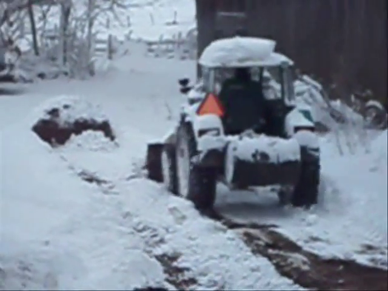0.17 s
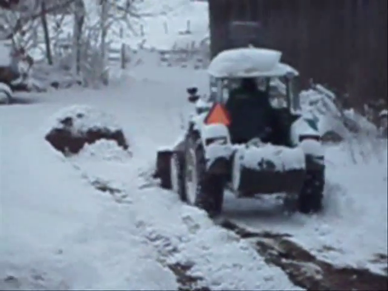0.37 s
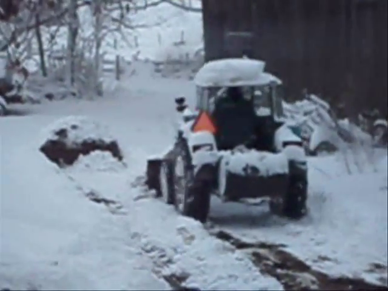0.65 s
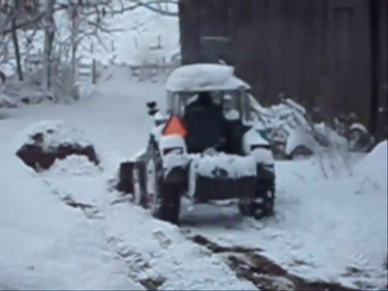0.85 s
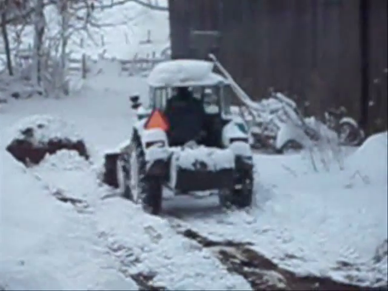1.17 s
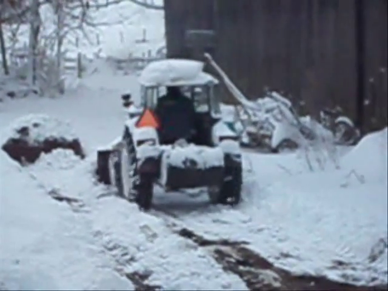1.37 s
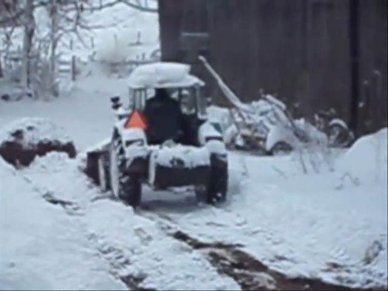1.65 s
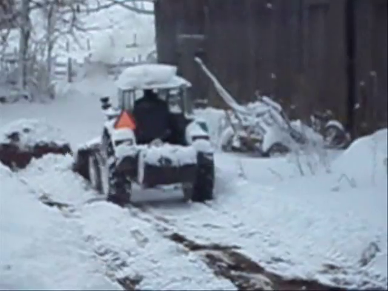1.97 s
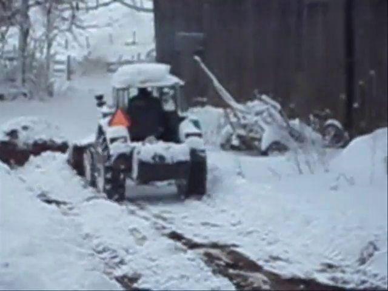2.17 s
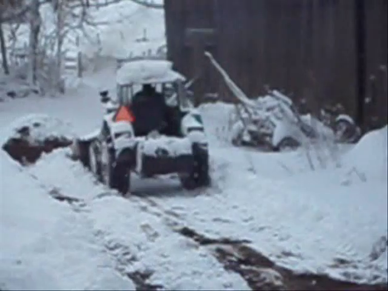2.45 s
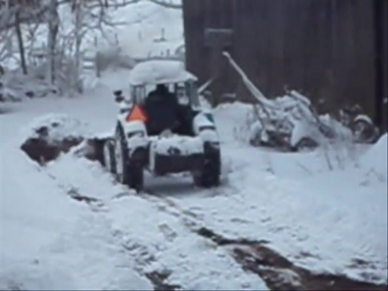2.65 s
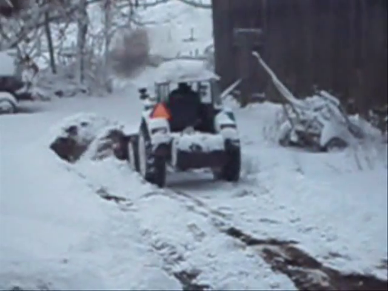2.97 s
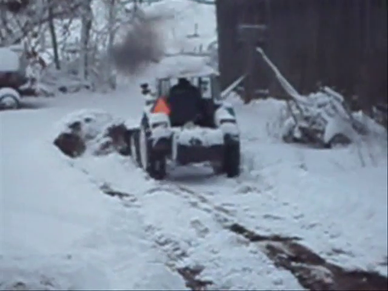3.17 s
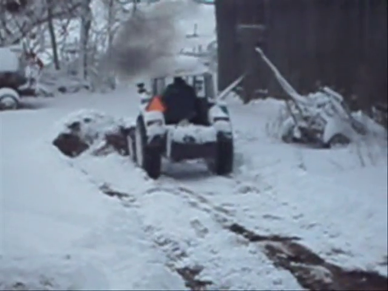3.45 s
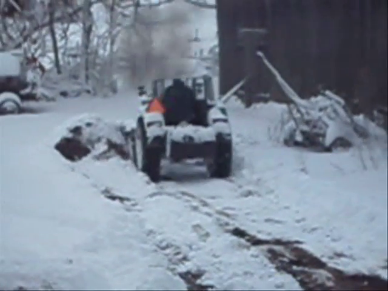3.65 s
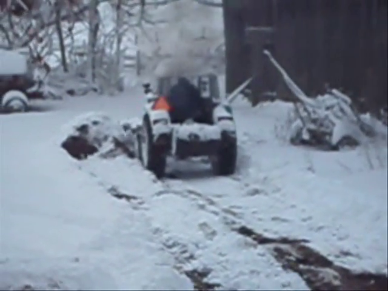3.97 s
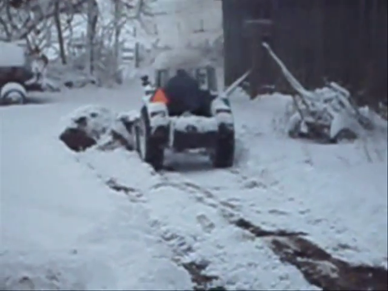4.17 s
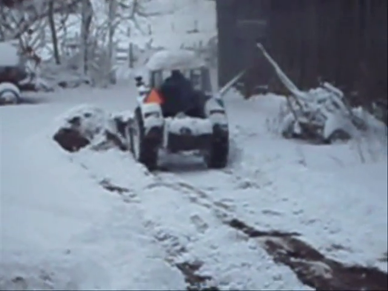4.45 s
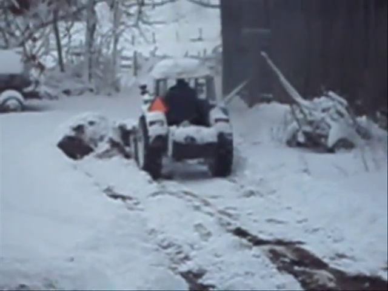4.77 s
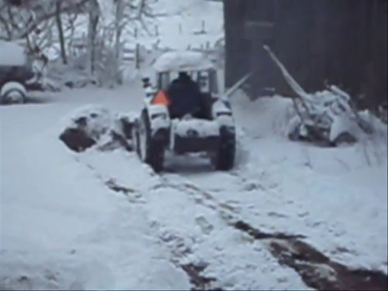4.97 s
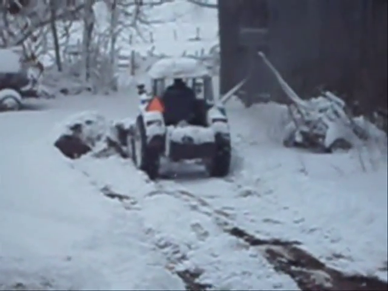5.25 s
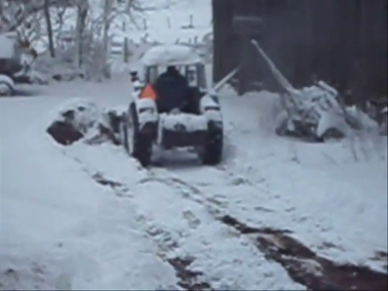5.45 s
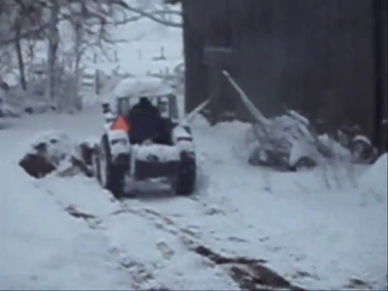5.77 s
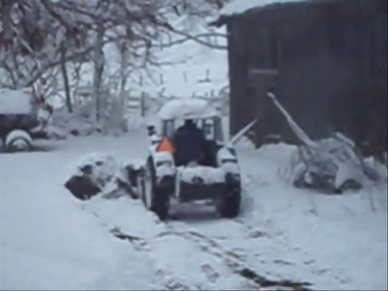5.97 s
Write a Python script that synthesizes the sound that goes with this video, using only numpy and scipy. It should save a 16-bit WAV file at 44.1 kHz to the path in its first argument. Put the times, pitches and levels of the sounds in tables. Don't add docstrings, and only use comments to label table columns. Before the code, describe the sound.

In a snowy farmyard, a nearby tractor drones and clatters under load, with one short dip in power. Its exhaust then softens and the firing slows into separate, uneven pulses. Heavy metal knocks and dragging scrapes follow, then a few dry clicks on the camera case. At the end the engine revives, louder and rattling. The small camera microphone sounds boxy and harsh, with low wind rumble.

```python
import sys
import numpy as np
from scipy import signal
from scipy.io import wavfile
from scipy.ndimage import uniform_filter1d

SR = 44100
rng = np.random.default_rng(int(sys.argv[2]) if len(sys.argv) > 2 else 0)


def voltage_ratio(decibels):
    exponent = np.asarray(decibels, float) / 20
    return 10 ** exponent


def wav_record(signal):
    frames = np.transpose(np.atleast_2d(signal))
    bounded = np.clip(frames, -1, 1)
    quanta = np.round(bounded * 32767).astype(np.int16)
    wavfile.write(sys.argv[1], SR, quanta)


N = 269892
TIME_S = np.arange(N) / SR


def level(x):
    return x / np.sqrt(np.mean(x ** 2))


def band(x, hz, width_hz):
    return signal.lfilter(*signal.iirpeak(hz, hz / width_hz, fs=SR), x)


def body(x, modes, tilt_db_per_oct=0):
    total = 0
    for k, (hz, width_hz, db) in enumerate(modes):
        gain = voltage_ratio(db + tilt_db_per_oct * np.log2(hz / 700))
        total = total + (-1) ** k * gain * band(x, hz, width_hz)
    return level(total)


def walk(rate_hz):
    hold = int(SR / rate_hz)
    steps = np.repeat(rng.standard_normal(N // hold + 1), hold)
    return level(uniform_filter1d(uniform_filter1d(steps, hold), hold)[:N])


def curve(table):
    s, *columns = np.transpose(table)
    return [np.interp(TIME_S, s, c) for c in columns]


def extra_db(table, usual_db=0):
    total_db = 0
    for s, db in table:
        total_db = total_db + max(db - usual_db, 0) * ((TIME_S > s - .002) & (TIME_S < s + .012))
    return total_db


def puffs(turns, hz, length_s, steady, scatter_db, repeat=0):
    cylinder_db = [0, -1, -.4, -1.4]
    firing = turns + 1 + 1.33 - 29.5 / hz
    cycle = firing.astype(int)
    since_s = (firing - cycle) / hz
    size = voltage_ratio(scatter_db * rng.standard_normal(N // 250) + np.resize(cylinder_db, N // 250))
    burst = level(size[cycle] * (1 - np.exp(-since_s / 0.00064)) * np.exp(-(since_s / length_s) ** 2))
    habit = rng.standard_normal((2, 4, SR // 10))[:, cycle % 4, (since_s * SR).astype(int)]
    drift = 2 * np.pi * .35 * TIME_S
    same = habit[0] * np.cos(drift) + habit[1] * np.sin(drift)
    fresh = rng.standard_normal(N)
    return (steady + burst) * (repeat * same + np.sqrt(1 - repeat ** 2) * fresh)


def wind():
    # time in seconds, level in dB.
    gusts = [
        (0, -24.5),
        (.3, -27.5),
        (.75, -27.5),
        (1.5, -24),
        (2.6, -35.5),
        (3.7, -33.5),
        (4.4, -29.5),
        (5.4, -34),
        (6.12, -29.5),
    ]
    gust_db, = curve(gusts)
    deep = level(band(band(rng.standard_normal(N), 21.96, 30), 21.96, 40))
    tail = level(band(rng.standard_normal(N), 126.8, 85))
    return voltage_ratio(gust_db + 1.3 * walk(6)) * (deep + voltage_ratio(-5.5) * tail)


def ticks():
    # start in seconds, peak in dB, ring in Hz, t60 in seconds.
    pushes = [
        (5.422, -22, 1700, .005),
        (5.171, -29, 3800, .008),
        (5.4218, -13, 3700, .004),
        (5.4226, -19, 2600, .006),
        (5.8235, -13, 1600, .006),
        (5.8235, -10, 700, .012),
        (5.8245, -17, 1000, .02),
        (5.8265, -17, 250, .025),
        (4.187, -14, 110, .03),
        (4.70, -21, 2600, .003),
    ]
    out, t = np.zeros(N + SR), np.arange(SR // 10) / SR
    for s, db, hz, t60_s in pushes:
        start = int(s * SR)
        ring = np.sin(2 * np.pi * hz * t) * np.exp(-np.log(1000) * t / t60_s)
        out[start:start + len(t)] += voltage_ratio(db) * ring
    return out[:N]


def steel(out, s, db, low_hz, high_hz, high_db, t60_s, rise_s):
    t = np.arange(SR // 4) / SR
    decay = np.exp(-np.log(1000) * t / max(t60_s, .004))
    blow = rng.standard_normal(len(t)) * (1 - np.exp(-(t / rise_s) ** 2)) * decay
    low = level(band(band(blow, low_hz, 330), low_hz, 330))
    ring = low + voltage_ratio(high_db) * level(band(blow, high_hz, 1500))
    out[int(s * SR):int(s * SR) + len(t)] += voltage_ratio(db) * ring / np.abs(ring).max()


def loader():
    # start in seconds, peak in dB, low ring in Hz, high ring in dB, t60 in seconds.
    clanks = [
        (4.208, -18.5, 636, -12, 0.053),
        (4.424, -10, 785, -13, 0.094),
        (4.437, -7, 846, -8.5, 0.12),
        (4.439, -11.5, 1085, -21, .06),
        (4.458, -25, 1000, -15, 0.024),
        (4.524, -17, 915, 12, 0.087),
        (4.698, -29, 1010, -14, 0.032),
        (5.169, -30, 620, -15, 0.024),
        (5.24, -24.5, 700, -31, 0.065),
        (5.627, -17.5, 680, -2, 0.055),
    ]
    # start in seconds, peak in dB, high ring in Hz, high ring in dB, t60 in seconds.
    scrapes = [
        (3.67, -24, 2960, -5.5, 0.13),
        (3.76, -23.5, 3600, -9, 0.087),
        (3.95, -25.5, 3030, -20, 0.15),
        (4.51, -17.5, 2600, -3, 0.039),
        (4.582, -17, 3130, -7, .1),
        (4.595, -20, 2830, -9, 0.42),
        (4.885, -27, 3600, -1, 0.59),
        (5.205, -24, 3530, 16, .13),
        (5.45, -26.5, 2750, -3, 0.18),
        (5.48, -22.5, 3530, 4, 0.072),
    ]
    out = np.zeros(N + SR)
    for s, db, low_hz, high_db, t60_s in clanks:
        steel(out, s, db, low_hz, 3060, high_db, t60_s, rise_s=0.00033)
    for s, db, high_hz, high_db, t60_s in scrapes:
        steel(out, s, db, 810, high_hz, high_db, t60_s, rise_s=.01)
    return out[:N]


def rattle(turns, hz):
    # time in seconds, level in dB.
    buzz = [
        (5.62, -60),
        (5.7, -40),
        (5.8, -41),
        (5.85, -46),
        (5.96, -37),
        (6.12, -41),
    ]
    # centre in Hz, width in Hz, level in dB.
    modes = [(2070, 110, 5), (2205, 300, -2), (2700, 130, -3)]
    s, db = np.transpose(buzz)
    shake = body(puffs(2 * turns, 2 * hz, 0.018, 0.15, 1.7), modes)
    return voltage_ratio(np.interp(TIME_S, s, db, left=-99)) * shake


def hydraulic_pump(turns):
    # time in seconds, level in dB.
    work = [
        (0, -32.5),
        (.7, -37),
        (.95, -50.5),
        (1.7, -39.5),
        (1.85, -33),
        (2.35, -32.5),
        (2.45, -49.5),
        (6.12, -56.5),
    ]
    pump_db, = curve(work)
    return voltage_ratio(pump_db) * tone(turns, 17 / 4, 0)


def gear_train(turns, hz, block_db, idle):
    # centre in Hz, width in Hz, level in dB.
    modes = [(1590, 280, 1), (2190, 660, -2), (2600, 260, 6), (3530, 750, -7)]
    drive = puffs(turns, hz, 0.011, 1.1 + 1.1 * idle, scatter_db=1.2)
    return voltage_ratio(block_db - 12 - 0.53 * TIME_S) * body(drive, modes)


def knock(turns, hz, knock_db):
    # centre in Hz, width in Hz, level in dB.
    wall_modes = [(1756, 3600, -11.5), (2600, 560, 0), (3243, 160, -3)]
    # centre in Hz, width in Hz, level in dB.
    ping_modes = [(3600, 350, -3), (4023, 300, -3.5)]
    # time in seconds, peak in dB.
    hard_firings = [(0.1526, -25), (0.2067, -23), (0.2433, -33), (0.4788, -30), (0.5861, -23),
                    (0.7706, -33), (0.9043, -18), (0.9552, -30), (1.0231, -25), (1.077, -23), (1.0919, -19),
                    (1.502, -26), (1.5217, -19), (1.5863, -24), (1.6387, -24), (1.707, -28), (1.723, -21.5),
                    (1.8432, -27), (1.8602, -22.5), (1.8796, -23), (1.9295, -19), (1.9829, -29),
                    (2.142, -26), (2.2064, -24), (2.5257, -28), (2.5446, -14.5), (2.5634, -20.5),
                    (2.831, -27.5), (2.8998, -24), (2.9168, -24)]
    late_db = extra_db(hard_firings, usual_db=-31)
    walls = body(puffs(turns, hz, 0.0066, 0.19, scatter_db=1.4), wall_modes)
    ping = body(puffs(turns, hz, 0.0066, 0.19, scatter_db=1.4), ping_modes)
    return voltage_ratio(knock_db + 0.68 * late_db) * walls + voltage_ratio(knock_db + late_db - 1.5) * ping


def engine_block(turns, hz, block_db, idle):
    # centre in Hz, width in Hz, level in dB.
    modes = [(157, 120, -17.5), (301.8, 71, -4), (418.7, 70, -5.5), (570.8, 120, -0.5), (676, 99, 2),
             (767, 80, 3), (861, 88, 1.5), (949, 80, 3), (1049.5, 66, 0.5), (1183.5, 87, -4.5)]
    # time in seconds, extra level in dB.
    heavy_firings = [(.1, 7), (.51, 3), (.876, 3), (.99, 0.5), (1.61, 5), (1.88, 4.5), (2.364, 3.5),
                     (2.581, 7), (2.728, 4.5), (2.78, 7.5), (2.818, 2.5), (3.475, -1.5), (3.94, 0.5),
                     (4.948, 1.5), (5.879, 0), (5.935, -6)]
    drive = puffs(turns, hz, 0.011, 0.99 + 0.9 * idle, scatter_db=1.2, repeat=.7)
    ring = body(drive, modes, tilt_db_per_oct=-2.5 * idle)
    muffled = signal.sosfilt(signal.butter(4, 1282, fs=SR, output="sos"), ring)
    return voltage_ratio(block_db + extra_db(heavy_firings)) * muffled


def tone(turns, multiple, lag_turns):
    return np.sqrt(2) * np.cos(2 * np.pi * (multiple * turns - lag_turns))


def wavering_orders(turns, table, block_db):
    total = 0
    for multiple, db in table:
        total = total + voltage_ratio(db + 4.5 * walk(5)) * tone(turns, multiple, rng.random())
    return voltage_ratio(block_db) * total


def minor_orders(turns, block_db):
    # multiple of firing rate, level in dB re block.
    orders = [(.25, -10.5), (.5, -10.5), (.75, -5), (1.75, -14.5)]
    return wavering_orders(turns, orders, block_db) * voltage_ratio(-0.6 * TIME_S)


def cab_panels(turns, block_db):
    # multiple of firing rate, level in dB re block.
    orders = [(3.75, -20), (4, -18), (4.75, -18), (5, -19), (5.25, -19), (5.5, -18), (5.75, -17), (6, -19)]
    # centre in Hz, width in Hz.
    panels = [(250, 70), (330, 70)]
    overtones = wavering_orders(turns, orders, block_db) * voltage_ratio(-1 * TIME_S)
    return sum(band(band(overtones, hz, width_hz), hz, width_hz) for hz, width_hz in panels)


def exhaust(turns, hz, idle):
    # time in seconds, level in dB.
    pressure = [(0, -18.5), (.85, -20), (1.2, -11), (1.6, -12), (2.25, -9), (2.411, -9), (2.498, -24),
                (2.579, -7.5), (2.69, -11), (3.301, -12), (3.379, -24), (3.75, -22), (4.5, -22),
                (5.552, -21), (5.681, -19), (5.799, -19.5), (5.968, -12), (6.12, -16)]
    # time in seconds, change in dB, half length in seconds.
    surges = [(.09, 4.5, 0.017), (0.263, 2, 0.048), (0.777, -2.5, 0.046), (.88, 3.5, .02), (1.1, -1.5, .03),
              (1.55, -2, 0.035), (3.766, -6, 0.031), (4.149, 0, 0.13), (4.303, 6, 0.012),
              (4.578, -3.5, 0.11), (4.908, 3, .035), (4.954, -8.5, 0.01), (5, 5, 0.014), (5.129, -5, .09),
              (5.292, -3.5, .04), (5.35, 0, 0.023), (5.568, -3.5, .03), (5.684, 3.5, .03)]
    # time in seconds, overtone gain in dB.
    sharpness = [(0, -3.5), (.4, 7), (1.0, -1.5), (1.45, 1.5), (2.2, -1), (2.39, -4), (2.44, -5), (2.7, -4),
                 (3.28, 0), (3.36, -8), (3.6, -3.5), (3.9, 1.5), (4.4, 1), (4.8, 1), (5.1, -5), (5.5, 3),
                 (5.8, 5), (6.12, -4)]
    # frequency in Hz, gain in dB.
    pipe = [(25, -1.5), (31, 5), (47, -7.5), (54, 0.5), (63, -9), (80, -0.5), (115, -8.5), (176, -19.5)]
    order_levels_db = [1, -4.5, -11, -15]
    # cut start in seconds, cut end in seconds.
    fuel_cuts = [
        (2.43, 2.52),
        (3.33, 5.6),
    ]
    cut_lags = [.32, .53, 0, 0]
    lags = (0, .27, -.2, .1)
    (pressure_db,), (sharp_db,) = curve(pressure), curve(sharpness)
    for s, db, half_s in surges:
        pressure_db = pressure_db + db * np.exp(-((TIME_S - s) / half_s) ** 2)
    cut = sum((TIME_S > a) * 1. - (TIME_S > b) for a, b in fuel_cuts)
    cut = uniform_filter1d(cut, size=1500)
    pipe_hz, pipe_db = np.transpose(pipe)
    out = 0
    for k, db in enumerate(order_levels_db):
        order_db = pressure_db + db + np.interp(np.log((k + 1) * hz), np.log(pipe_hz), pipe_db)
        if k > 0:
            order_db = order_db + sharp_db
        if k == 2:
            order_db = order_db - (1 - cut) * np.minimum(TIME_S, 3.3)
        order_db = order_db + idle * (3 * (k > 0) + 1.8 * walk(25))
        out = out + voltage_ratio(order_db) * tone(turns, k + 1, lags[k] + cut_lags[k] * cut)
    return out


def scene():
    # time in seconds, firing rate in Hz.
    speed = [(0, 58.85), (0.53, 57.64), (0.69, 58.9), (1.69, 58.46), (1.86, 57.94), (2.27, 57.94),
             (2.59, 54.28), (2.84, 57.52), (3.18, 59.96), (3.28, 58.4), (3.82, 46.15), (4.04, 44.83),
             (4.29, 39.55), (5.2, 28.87), (5.45, 24.78), (5.55, 24.98), (5.89, 30.07), (6.12, 38.7)]
    # time in seconds, force on the block in dB, ignition hardness in dB.
    combustion = [(0, -26, -17.5), (.47, -23.5, -14.5), (.85, -27, -15), (1.3, -21, -16.5),
                  (1.85, -23.5, -14), (2.369, -22, -18.5), (2.431, -31, -20.5), (2.52, -33, -20),
                  (2.569, -21, -15.5), (2.7, -25, -13.5), (3.289, -24, -13.5), (3.352, -38, -22),
                  (3.75, -33.5, -24), (4.499, -30.5, -23), (5.571, -40.5, -23.5), (5.638, -27.5, -18.5),
                  (5.831, -27, -14), (5.96, -19, -16)]
    (hz,), (block_db, hard_db) = curve(speed), curve(combustion)
    turns = .37 + np.cumsum(hz) / SR
    knock_db = block_db + hard_db
    idle = uniform_filter1d(np.clip((-40 - knock_db) / 15, 0, 1), size=4000)
    surroundings = wind() + ticks() + loader()
    mechanics = rattle(turns, hz) + hydraulic_pump(turns) + gear_train(turns, hz, block_db, idle)
    firing = knock(turns, hz, knock_db) + engine_block(turns, hz, block_db, idle)
    hum = minor_orders(turns, block_db) + cab_panels(turns, block_db) + exhaust(turns, hz, idle)
    return (surroundings + mechanics + firing + hum)[None]


def top_cut(x):
    return signal.sosfilt(signal.butter(12, 15750, fs=SR, output="sos"), x)


def record(dry):
    block_in, block_out = 512, 2820
    x = signal.sosfilt(signal.butter(4, 4300, fs=SR, output="sos"), dry)
    x = x + voltage_ratio(-58) * rng.standard_normal(x.shape)
    block, place = np.divmod(np.arange(N), block_out)
    sample = block * block_in + place * 8000 // SR
    held = x[:, sample * block_out // block_in]
    mix = np.round(np.clip(held, -1, 1) * 128) / 128
    return top_cut(mix)


dry = scene()
out = record(dry)
wav_record(out)
```